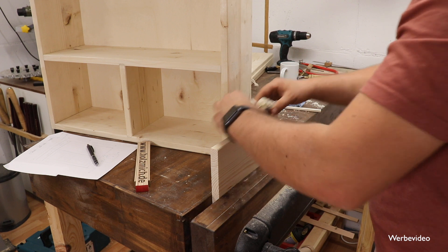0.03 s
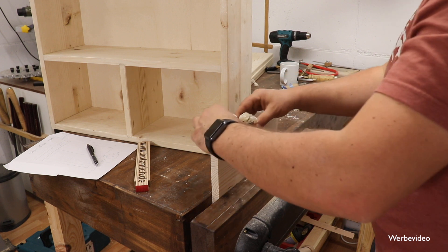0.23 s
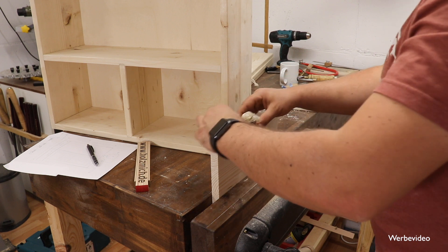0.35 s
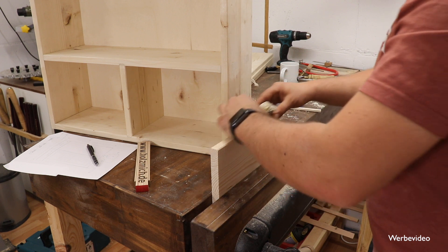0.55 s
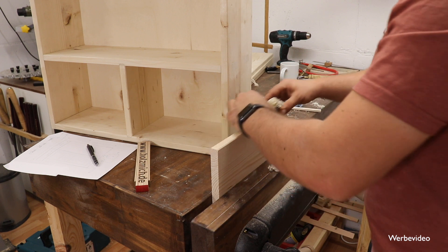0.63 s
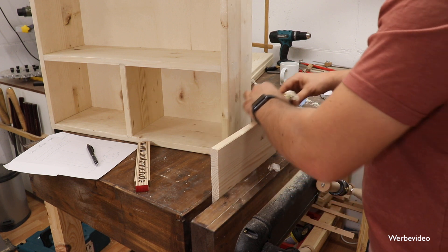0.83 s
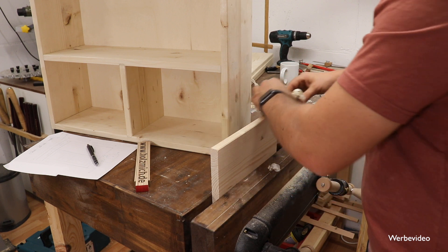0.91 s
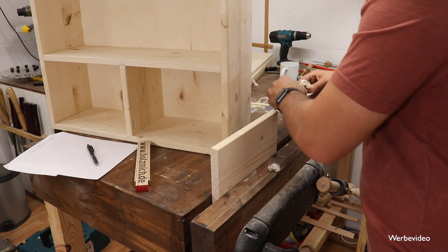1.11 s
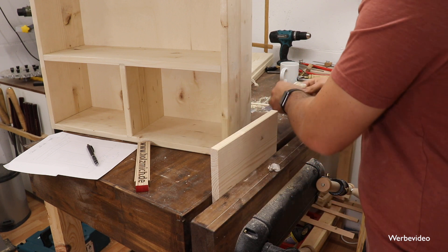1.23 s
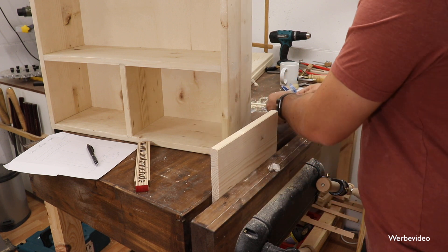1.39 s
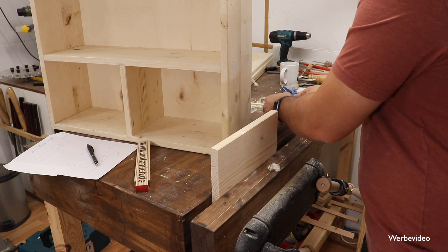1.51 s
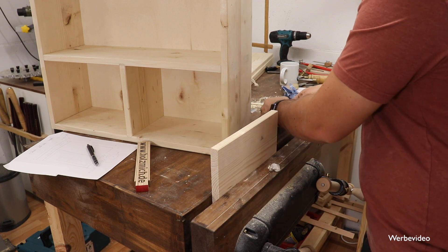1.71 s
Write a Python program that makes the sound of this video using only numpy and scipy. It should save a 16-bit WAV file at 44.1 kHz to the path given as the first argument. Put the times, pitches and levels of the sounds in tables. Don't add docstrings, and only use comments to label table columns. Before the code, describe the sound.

A hand plane shaves softwood, heard closely in a small, lightly reverberant workshop with faint hiss. It slides back softly, then knocks hollowly onto the board at 0.2-0.3 s. From 0.4 s a dry, woody rasp grows, chattering briefly with a buzzing tone before releasing with a snap and thud at 0.8 s. It coasts until 1.05 s, ticks off the edge, rustles faintly, and touches down again at 1.66 s.

```python
import sys
import numpy as np
from scipy import signal
from scipy.fft import rfft, irfft, next_fast_len
from scipy.io import wavfile
from scipy.ndimage import map_coordinates

SR = 44100
rng = np.random.default_rng(int(sys.argv[2]) if len(sys.argv) > 2 else 0)


def voltage_ratio(decibels):
    exponent = np.asarray(decibels, float) / 20
    return 10 ** exponent


def unload_audio(sound):
    columns = np.transpose(np.atleast_2d(sound))
    steps = np.round(np.clip(columns, -1, 1) * 32767)
    wavfile.write(sys.argv[1], SR, steps.astype(np.int16))


N = 77175


# start_s, level_db (force), tear_db and bench_db (both over the force)
CUT_FORCE = [(.345, -54, -15, 11), (.38, -45, -16, 1.5), (.41, -40, -11.5, -5), (.45, -38, -9, -4),
             (.6, -36.5, -6.5, -6), (.67, -32.5, -9.5, -6), (.73, -33, -6.5, -14), (.805, -32.5, -7, -12.5),
             (.815, -38.5, -4.5, -4.5), (.85, -48, 1.5, 6), (.9, -66, 6, 3)]
# pitch_hz, level_db (per Hz)
CUT_SPECTRUM = [(300, -46), (480, -9), (741, -0.5), (1000, -5.5), (1470, -1.5), (2000, -8.5), (6000, -21.5),
                (8000, -60)]
# pitch_hz, width_hz, level_db
CUT_MODES = [(624, 44, -5), (767, 70, -2), (860, 47, -1.5), (1327, 150, -0.5), (1428, 77, -2),
             (1518, 34, -0.5), (1670, 37, -29), (2250, 89, -4.5), (3224, 120, -12.5), (4170, 120, -19)]
# pitch_hz, width_hz, level_db
BENCH_MODES = [(150, 26, -14), (270, 42, -1.5), (320, 29, -0.5), (400, 51, -5)]
# pitch_hz, level_db (per Hz)
TEAR_SPECTRUM = [(2000, -33), (3000, -8), (3880, -5), (5160, -2.5), (6720, -10), (8280, -5), (9800, -14.5),
                 (15800, -25)]
# pitch_hz, level_db (per Hz)
FIZZ_SPECTRUM = [(8000, -35), (10000, -11), (13000, 4), (15800, -13.5)]


def shaving():
    force = gain(CUT_FORCE)
    drone = voltage_ratio(2.5) * rub(CUT_SPECTRUM, CUT_MODES, ring_db=-4.0, spike_db=2.5, clump_db=1.0)

    pressed = filtered(grit(spike_db=1.0, clump_db=1.5), ringing(BENCH_MODES))
    pressed = filtered(pressed, lambda hz: hz > 110)
    bench = gain(CUT_FORCE, order=3) * unit(pressed)

    fibres = grit(spike_db=1.74, clump_db=0.65)
    fizz_growth = (force / force.max()) ** 1.9
    fizz = voltage_ratio(-14.5) * fizz_growth * coloured(fibres, FIZZ_SPECTRUM)
    tear = gain(CUT_FORCE, order=2) * (coloured(fibres, TEAR_SPECTRUM) + fizz)
    return force * (drone + bench + tear)


# start_s, level_db, octave_db (over the level)
CHATTER_LEVEL = [(.65, -55, -5), (.69, -33, -6), (.73, -41, 0), (.762, -36, 0), (.769, -23, -6),
                 (.777, -34, 0), (.79, -31, -1), (.799, -34, 4), (.804, -34, 10), (.808, -36, 2),
                 (.814, -55, 0)]


def chatter():
    chatter_hz, jitter, swell_db, octave_ratio = 771, .022, 2.5, 2.03
    turn = 2 * np.pi * np.cumsum(chatter_hz * (1 + jitter * wobble(149.95))) / SR
    octave = voltage_ratio(swell_db * wobble(120)) * np.sin(octave_ratio * turn)
    tone = voltage_ratio(swell_db * wobble(120)) * np.sin(turn)
    return gain(CHATTER_LEVEL) * (tone + gain(CHATTER_LEVEL, order=2) * octave)


# start_s, level_db
COAST_LEVEL = [(.812, -36.5), (.86, -35), (.91, -31.5), (.965, -32), (1.005, -39.5), (1.045, -36),
               (1.065, -52), (1.12, -54.5), (1.16, -73)]
# pitch_hz, level_db (per Hz)
COAST_SPECTRUM = [(80, -58), (200, -8), (480, -17.5), (680, -3), (900, -8.5), (1600, -5.5), (2500, -13),
                  (9000, -28), (15000, -51)]
# pitch_hz, width_hz, level_db
COAST_MODES = [(398, 28, 1.5), (695, 42, 3), (1210, 74, -4.5), (1520, 245, 0.5), (1830, 48, 1.5),
               (2110, 110, -0.5), (3154, 30, -4.5)]


def coasting():
    rubbing = rub(COAST_SPECTRUM, COAST_MODES, ring_db=0.0, spike_db=2.0, clump_db=0.95)
    return gain(COAST_LEVEL) * voltage_ratio(-0.62) * rubbing


# start_s, level_db
BACK_LEVEL = [(0, -50), (.02, -49.5), (.12, -52), (.16, -51), (.2, -56), (.215, -48)]
# pitch_hz, level_db (per Hz)
BACK_SPECTRUM = [(70, -50), (150, -4), (420, -23), (700, -2.5), (1300, -5.5), (5000, -27.5), (9000, -48.5)]
# pitch_hz, width_hz, level_db
BACK_MODES = [(313, 51, -7), (579, 48, 1), (663, 60, -1), (920, 120, -4.5), (1710, 41, -9.5),
              (3040, 110, -22), (4250, 170, -17.5)]


def drawing_back():
    rubbing = rub(BACK_SPECTRUM, BACK_MODES, ring_db=3.0, spike_db=1.5, clump_db=-0.9)
    return gain(BACK_LEVEL) * voltage_ratio(4.0) * rubbing


# start_s, level_db
SCRAPE_LEVEL = [(.98, -62), (1.01, -42), (1.03, -46), (1.048, -44.5), (1.054, -57), (1.1, -62), (1.13, -72)]
# pitch_hz, level_db (per Hz)
SCRAPE_SPECTRUM = [(700, -40), (1100, 1), (2400, 2), (3500, -15), (6000, -15.5), (12000, -43)]
# pitch_hz, width_hz, level_db
SCRAPE_MODES = [(1200, 83, 7), (1620, 130, 0), (2210, 140, -9), (3230, 200, -6)]


def heel_scrape():
    return gain(SCRAPE_LEVEL) * rub(SCRAPE_SPECTRUM, SCRAPE_MODES, ring_db=-6.0, spike_db=4.5, clump_db=2.5)


# start_s, level_db
AGAIN_LEVEL = [(1.657, -72), (1.662, -51), (1.674, -53), (1.692, -50), (1.71, -52.5), (1.725, -49.5),
               (1.75, -48.5)]
# pitch_hz, level_db (per Hz)
AGAIN_SPECTRUM = [(500, -33), (850, 0), (1300, 1), (2000, -0.5), (3000, -1.5), (5500, -7.5), (8400, -8.5),
                  (15500, -30)]


def next_stroke():
    return gain(AGAIN_LEVEL) * coloured(grit(spike_db=0.6, clump_db=0.7), AGAIN_SPECTRUM)


# start_s, level_db, hardness_hz
KNOCKS = [(0.2103, -24, 1820), (0.2157, -13, 890), (.227, -14, 695), (0.2343, -19, 890), (.241, -18.5, 620),
          (.251, -20, 600), (.259, -24, 600), (.269, -17.5, 510), (.278, -25, 500), (.2865, -17, 500),
          (0.295, -19.5, 500), (0.3, -25.5, 400), (.33, -30, 500), (.365, -33, 600), (0.661, -32, 350),
          (0.811, -26, 503), (1.05, -30.5, 700)]
# pitch_hz, level_db, t60_s
BOARD_MODES = [(152.8, -10.5, 0.24), (207, -4.5, 0.069), (266.7, 5.5, 0.049), (342.6, 3, 0.055),
               (400, 3.5, 0.062), (459, 2, 0.058), (625, -2.5, 0.086), (662, 6.5, 0.09), (763, 7, 0.051),
               (807, -1, 0.032), (1177, 9, .025), (1345, 8.5, 0.028), (1400, -9, 0.022)]
# pitch_hz, level_db (per Hz)
RATTLE_SPECTRUM = [(600, -15), (1400, 1), (5500, -16), (15000, -32)]


def bumps():
    out, t = np.zeros(N + SR), np.arange(SR // 3) / SR
    rattle = np.tile(coloured(grit(spike_db=1.5, clump_db=3.0), RATTLE_SPECTRUM), 2)
    scatters = rng.standard_normal((len(KNOCKS), len(BOARD_MODES)))
    onset = 1 - np.exp(-t / 0.002)
    for (s, db, hard_hz), scatter in zip(KNOCKS, scatters):
        ring = 0
        for (hz, level, t60), z in zip(BOARD_MODES, scatter):
            reach = 1 / (1 + (hz / hard_hz) ** 2)
            ring = ring + reach * voltage_ratio(level + 2 * z - 60 * t / t60) * np.sin(2 * np.pi * hz * t)
        start = round(s * SR)
        puff = voltage_ratio(-26 - 60 * t / 0.15) * (hard_hz / 800) ** 1.2 * rattle[start:][:len(t)]
        out[start:][:len(t)] += voltage_ratio(db - 7) * (puff - ring) * onset
    low_hz = 62.4
    return filtered(out, lambda f: (1j * f / (low_hz + 1j * f)) ** 3)[:N]


# start_s, level_db, pitch_hz, t60_s
FLEXES = [(.225, -44, 72, .35), (.225, -30, 150, .25), (.35, -47, 63, .44), (.47, -50, 66, .3),
          (.68, -52, 75, .3), (.76, -53, 66, .3), (.815, -38, 150, .15), (.815, -46, 70, .15),
          (.822, -27, 262, .19), (.825, -33, 200, .15), (.878, -29, 246, .13)]


def thuds():
    out, t = np.zeros(N + SR), np.arange(SR // 3) / SR
    onset = 1 - np.exp(-t / 0.0054)
    for s, db, hz, t60 in FLEXES:
        out[round(s * SR):][:len(t)] += voltage_ratio(db - 60 * t / t60) * np.sin(2 * np.pi * hz * t) * onset
    return out[:N]


# start_s, level_db, pitch_hz, life_cycles
CLICKS = [(.2103, -33, 1400, 2), (.2105, -41, 3000, 2), (.2165, -37, 4000, 3), (.2345, -40, 2800, 2),
          (.806, -29, 8000, 3), (.8065, -25, 4500, 1), (.8062, -31, 13000, 3), (.947, -36, 5000, 1),
          (.959, -27, 700, 2), (1.0156, -30, 1600, 4), (1.044, -27, 1220, 6), (1.0919, -36, 1200, 5),
          (1.103, -38, 1300, 4), (1.304, -48, 1100, 2), (1.338, -46, 1150, 2), (1.382, -46, 2000, 2),
          (1.6607, -32, 2400, .8), (1.6612, -41, 1500, 3), (1.6662, -44, 8000, 5), (1.6765, -33, 2100, 1.6),
          (1.6832, -32, 1700, .9), (1.69, -41, 2200, 3), (1.7215, -41, 1300, 4)]


def ticks():
    snap_share, snap_s, snap_full_hz = .45, .0004, 2600
    out, t = np.zeros(N + SR), np.arange(SR // 25) / SR
    for s, db, hz, cycles in CLICKS:
        share = snap_share * min(hz / snap_full_hz, 1) / cycles ** 2
        snap = share * np.exp(-t / snap_s) * rng.standard_normal(len(t))
        ring = np.exp(-t * hz / cycles) * np.sin(2 * np.pi * hz * t)
        out[round(s * SR):][:len(t)] += voltage_ratio(db) * (ring + snap)
    return out[:N]


# start_s, level_db
CARRY_LEVEL = [(1.06, -46), (1.15, -58), (1.22, -62), (1.35, -57), (1.42, -60.5), (1.62, -60.5),
               (1.655, -77)]
# pitch_hz, level_db (per Hz)
CARRY_SPECTRUM = [(60, -60), (150, -2), (1200, 4.5), (5000, -11), (14000, -20)]
# pitch_hz, width_hz, level_db
CARRY_MODES = [(620, 180, -9), (1044, 66, 9), (1280, 320, -0.5), (2640, 410, -16), (4500, 240, -5.5)]


def carrying_back():
    return gain(CARRY_LEVEL) * rub(CARRY_SPECTRUM, CARRY_MODES, ring_db=0.0, spike_db=3.0, clump_db=-1.5)


# start_s, level_db
CURL_LEVEL = [(1.2, -78), (1.28, -61), (1.35, -63), (1.385, -59), (1.43, -69), (1.56, -69), (1.65, -75)]
# pitch_hz, level_db (per Hz)
CURL_SPECTRUM = [(1200, -27), (1900, 2), (2700, -2), (4600, -1), (8000, -4), (14000, -13), (16000, -29)]


def curl_rustle():
    return gain(CURL_LEVEL) * coloured(grit(spike_db=1.5, clump_db=2.0), CURL_SPECTRUM)


# pitch_hz, t60_s
ROOM_DECAY = [(150, 0.59), (1000, 0.53), (4000, 0.42), (12000, 0.29)]


def room(x):
    hz, t, z = signal.stft(rng.standard_normal(SR // 2), SR, nperseg=256)
    decay = voltage_ratio(-60 * t / along(ROOM_DECAY, hz)[:, None])
    tail = signal.istft(z * decay, SR, nperseg=256)[1]
    delayed = np.pad(x, (round(.007 * SR), 0))
    return signal.fftconvolve(delayed, tail / np.linalg.norm(tail))[:N]


# pitch_hz, level_db (per Hz)
AIR_SPECTRUM = [(15, -38), (25, -18), (96, 0), (261, -5.5), (307, 0), (425, -5), (572, -2), (1390, -10),
                (15800, -20)]


def air():
    duck_db, duck_at_s, fall_s, back_s = -2.5, .26, .09, .1
    u = np.clip(np.arange(N) / SR - duck_at_s, 0, None)
    recovery = np.exp(-np.clip(u - fall_s, 0, None) / back_s)
    ducked_db = duck_db * np.minimum(u / fall_s, 1) * recovery
    hiss = coloured(grit(spike_db=0.2, clump_db=0.65), AIR_SPECTRUM)
    return voltage_ratio(-54.5 + ducked_db + 0.53 * wobble(6.22)) * hiss


def rub(wide, body, ring_db, spike_db, clump_db):
    broad = coloured(grit(spike_db, clump_db), wide)
    ring = unit(filtered(grit(spike_db, clump_db), ringing(body)))
    return unit(broad + voltage_ratio(ring_db) * ring)


def grit(spike_db, clump_db):
    clumps = wobble(220) + 0.56 * wobble(45.04)
    size_db = spike_db * rng.exponential(1, N) + clump_db * clumps
    return unit(rng.standard_normal(N) * voltage_ratio(size_db))


def ringing(body):
    def response(f):
        total = 0
        for k, (centre, width, db) in enumerate(body):
            damping = 1j * f * width
            total = total + (-1) ** k * voltage_ratio(db) * damping / (centre ** 2 - f * f + damping)
        return total
    return response


def coloured(x, points):
    return unit(filtered(x, lambda hz: voltage_ratio(along(points, hz))))


def filtered(x, response):
    m = next_fast_len(len(x) + SR // 4)
    return irfft(rfft(x, m) * response(np.fft.rfftfreq(m, 1 / SR)), m)[:len(x)]


def along(points, hz):
    f, v = np.transpose(points)
    return np.interp(np.log(hz + 1), np.log(f + 1), v)


def gain(rows, order=1):
    rows = np.asarray(rows)
    return voltage_ratio(np.interp(np.arange(N) / SR, rows[:, 0], rows[:, order], left=-150, right=-150))


def wobble(rate):
    knots = rng.standard_normal(int(N * rate / SR) + 4)
    return map_coordinates(knots, [np.arange(N) * rate / SR])


def unit(x):
    return x / np.sqrt(np.mean(x ** 2) + 1e-20)


def scene():
    cut = shaving() + chatter()
    slides = coasting() + drawing_back() + heel_scrape() + next_stroke()
    knocks = bumps() + thuds() + ticks()
    rustles = carrying_back() + curl_rustle()
    bench = cut + slides + knocks + rustles
    return (bench + voltage_ratio(-9.5) * room(bench) + air())[None]


def low_pass(x):
    return signal.sosfilt(signal.butter(12, 15730, fs=SR, output="sos"), x)


def record(dry):
    return low_pass(dry)


dry = scene()
out = record(dry)
unload_audio(out)
```